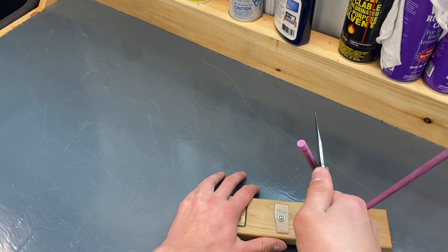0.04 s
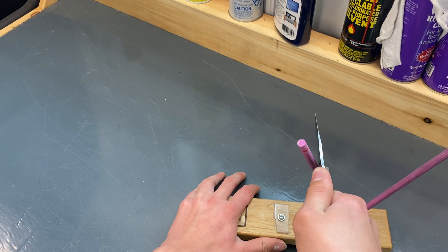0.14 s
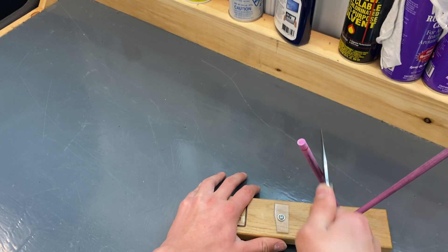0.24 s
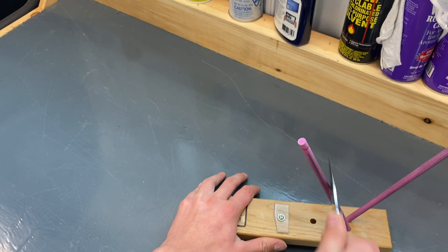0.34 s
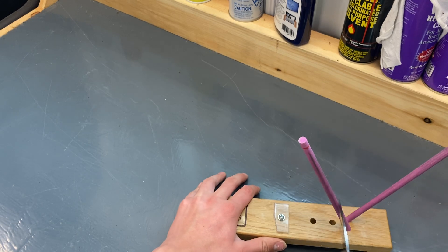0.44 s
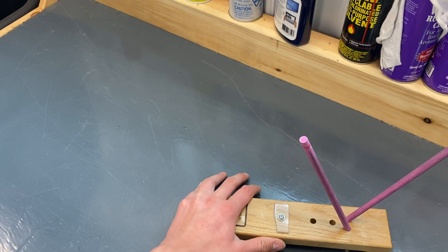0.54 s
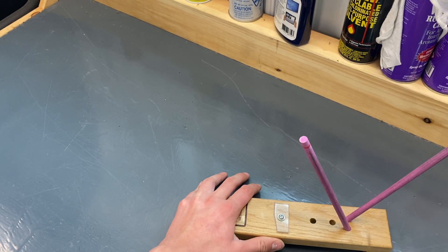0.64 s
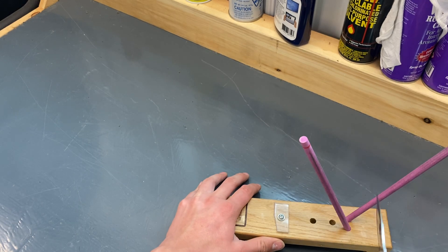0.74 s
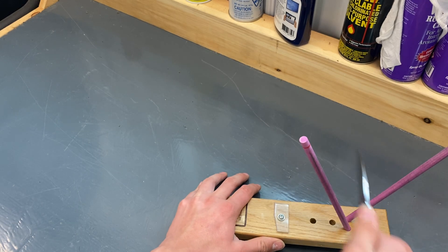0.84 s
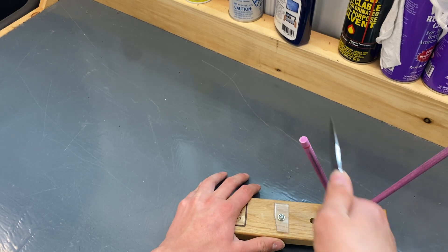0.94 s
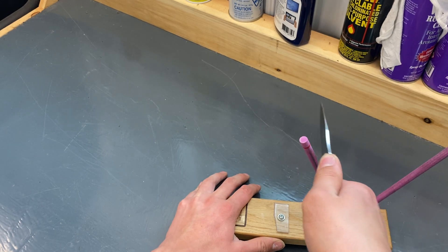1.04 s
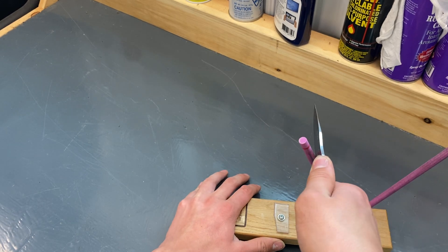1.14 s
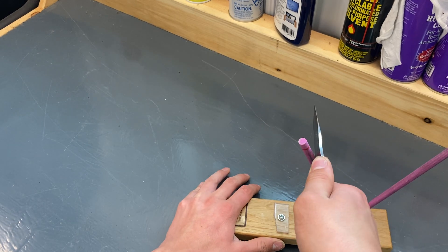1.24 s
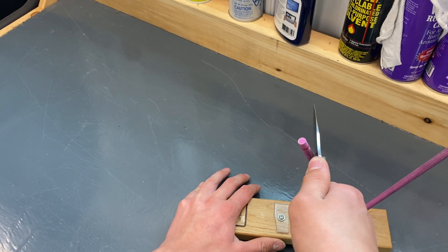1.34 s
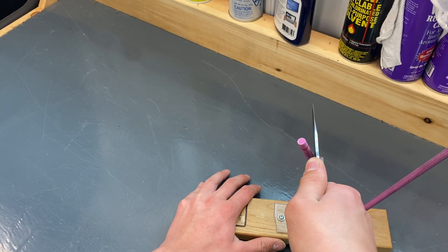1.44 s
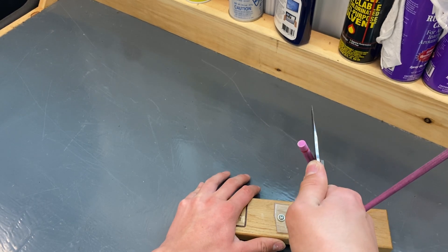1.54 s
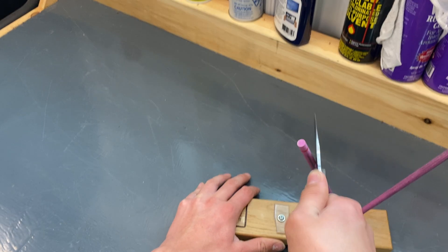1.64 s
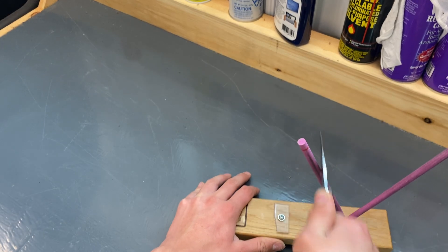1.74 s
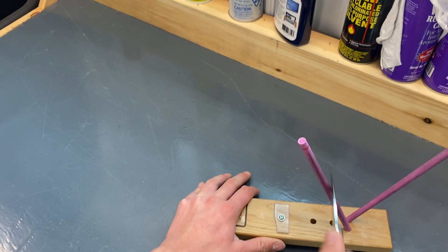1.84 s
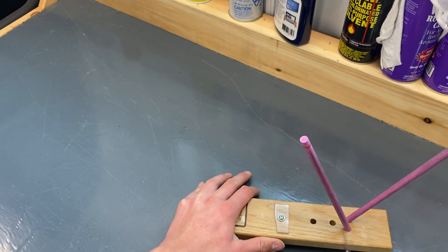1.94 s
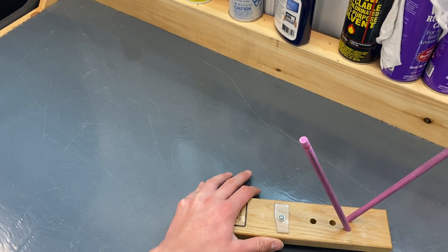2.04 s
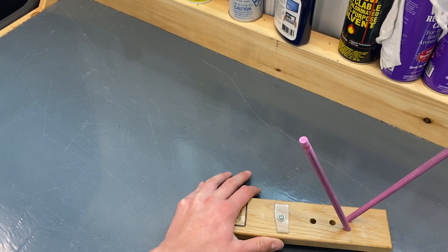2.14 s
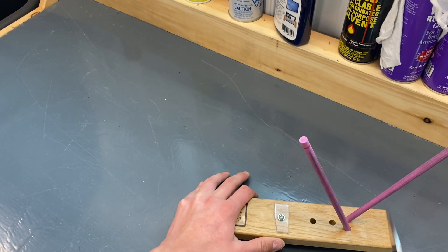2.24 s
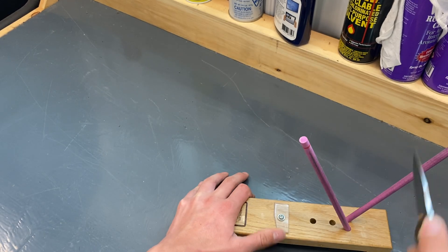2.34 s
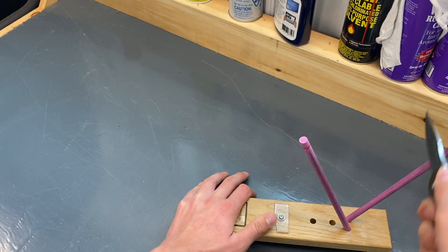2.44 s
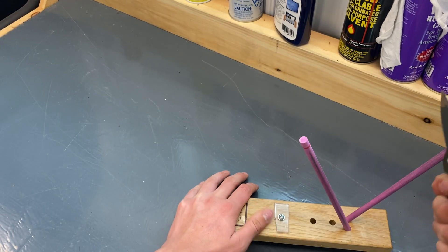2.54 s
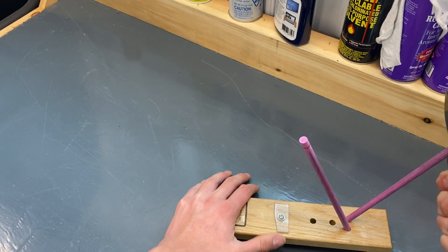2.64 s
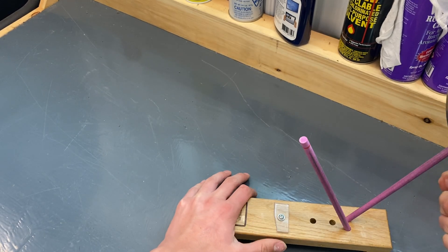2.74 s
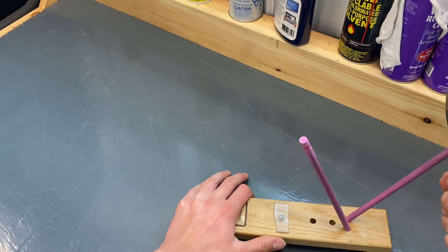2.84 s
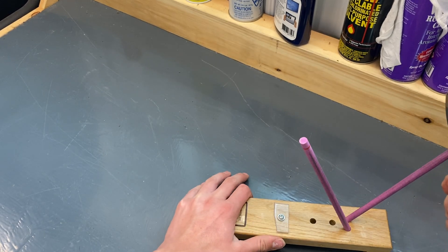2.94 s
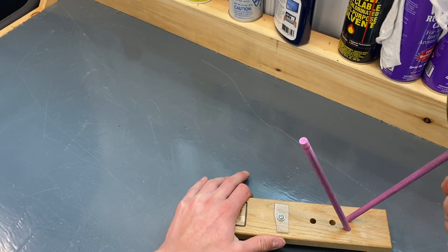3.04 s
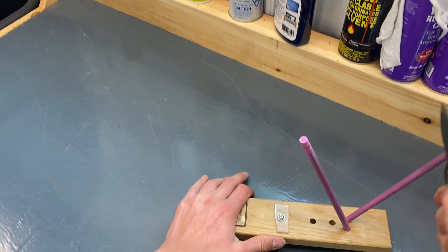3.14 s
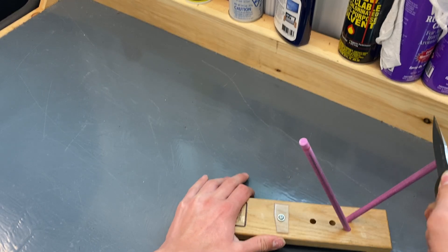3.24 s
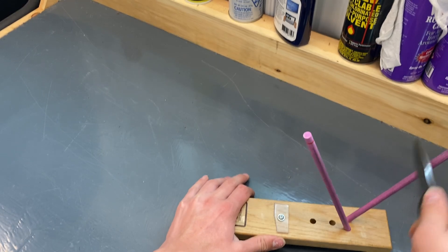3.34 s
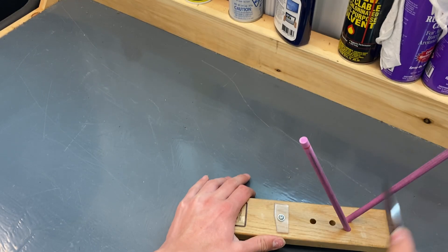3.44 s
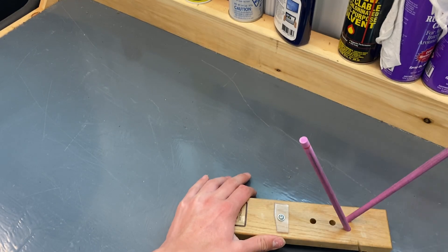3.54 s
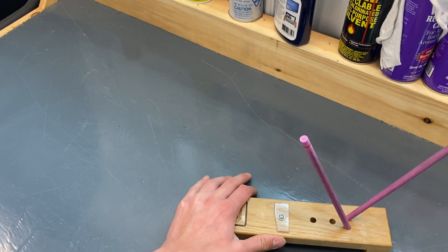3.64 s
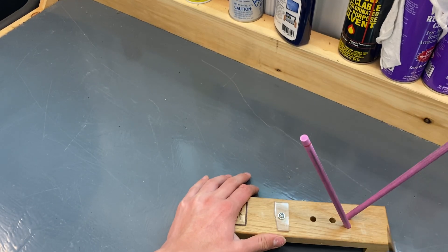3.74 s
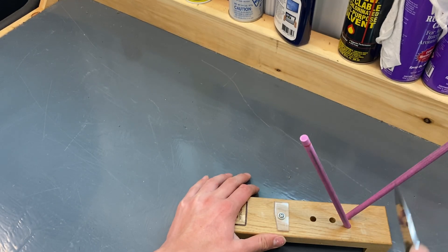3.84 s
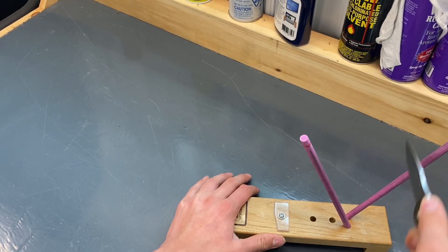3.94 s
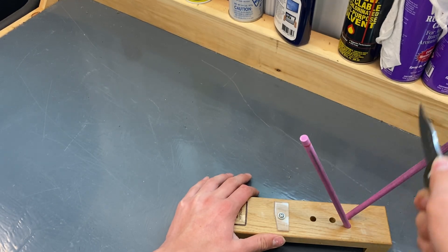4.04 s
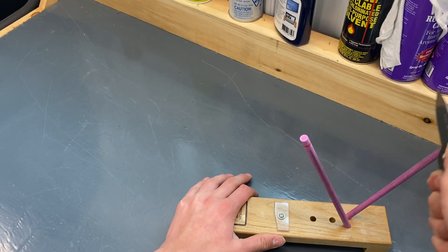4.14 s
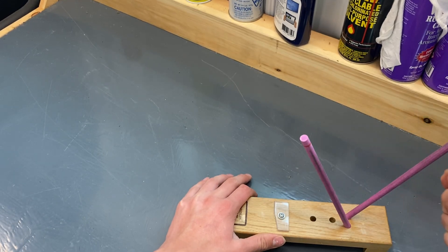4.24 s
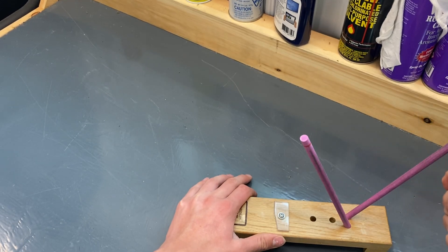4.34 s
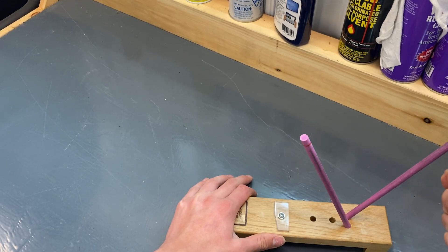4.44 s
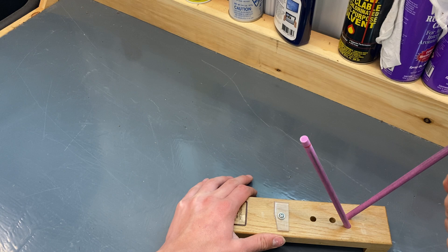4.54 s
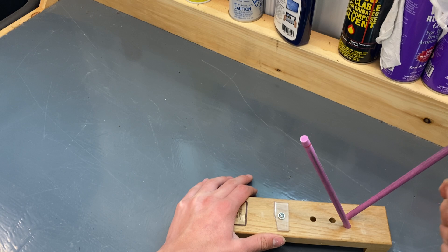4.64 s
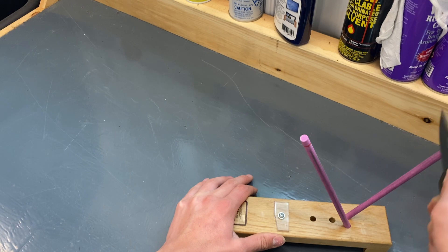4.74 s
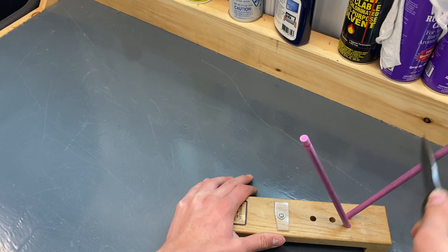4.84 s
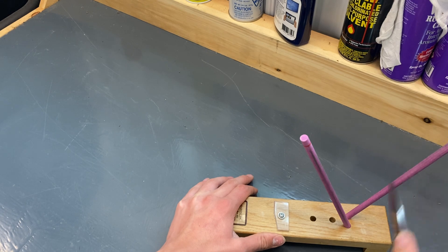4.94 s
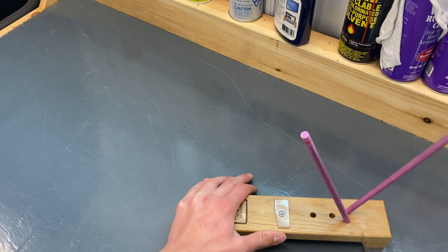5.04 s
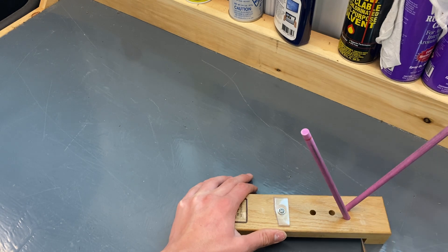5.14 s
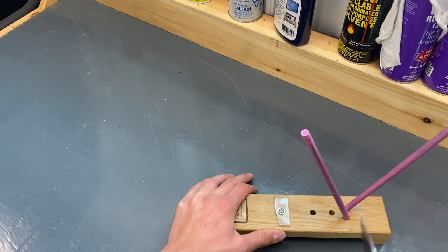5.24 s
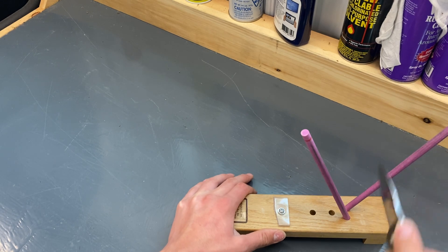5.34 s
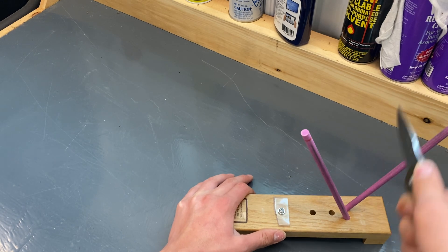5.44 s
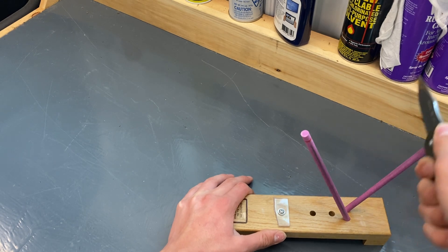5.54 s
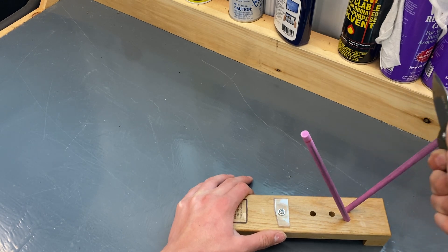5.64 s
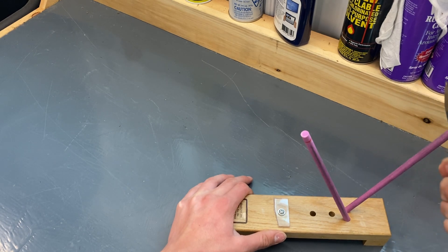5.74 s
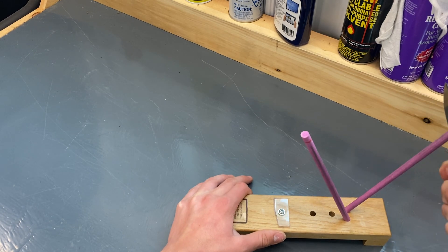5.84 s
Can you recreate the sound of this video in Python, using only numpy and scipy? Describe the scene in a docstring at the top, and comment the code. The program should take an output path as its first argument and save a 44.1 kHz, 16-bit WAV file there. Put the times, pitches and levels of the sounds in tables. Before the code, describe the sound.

A knife edge rasps down ceramic rods in four short separated strokes, each rising from hollow scrape to bright hiss, with wooden knocks between.

```python
"""Over a low workshop hush a knife edge lands, catches and rasps down a ceramic rod: four strokes on two rods.
Friction noise drives rod, blade and edge resonances; a blade resonance climbs from heel to tip as hiss grows.
The wooden base rumbles and bumps on the bench, and a rod clicks in its socket, all as noise bursts and damped
modes. Short bright zips, soft faint hiss swells and a faint tone join in; noise tails form the bare room's echoes."""
import sys
import numpy as np
from scipy import signal
from scipy.fft import rfft, irfft, next_fast_len
from scipy.io import wavfile
from scipy.ndimage import uniform_filter1d, map_coordinates

SR = 44100
rng = np.random.default_rng(int(sys.argv[2]) if len(sys.argv) > 2 else 0)


def generate_wav(sig):
    """Save sig (samples, or channels by samples) to the path in sys.argv[1] as 16-bit PCM at SR."""
    pcm = np.round(np.clip(np.atleast_2d(sig).T, -1, 1) * 32767).astype(np.int16)
    wavfile.write(sys.argv[1], SR, pcm)


N = 260188
TIME = np.arange(N) / SR  # s


def amp(db):
    """Logarithmic level: decibels become an amplitude gain."""
    return 10 ** (np.asarray(db) / 20)


def unit(x):
    """Power normalisation: the signal is scaled to rms 1."""
    return x / np.sqrt(np.mean(x ** 2) + 1e-20)


def along(points, hz):
    """Logarithmic frequency scale: (frequency_hz, value) points are interpolated on it."""
    frequency, value = np.transpose(points)
    return np.interp(np.log(hz + 1), np.log(frequency + 1), value)


def wobble(rate):
    """Slow random modulation: a smooth curve through `rate` random knots a second."""
    knots = rng.standard_normal(int(N * rate / SR) + 4)
    return map_coordinates(knots, [TIME * rate])


def filtered(x, response):
    """Linear filtering: the spectrum of x is multiplied by a response of frequency."""
    size = x.shape[-1]
    padded = next_fast_len(size + SR // 4)
    hz = np.fft.rfftfreq(padded, 1 / SR)
    return irfft(rfft(x, padded) * response(hz), padded)[..., :size]


def coloured(x, spectrum):
    """Spectral shaping: x is weighted by (frequency_hz, level_db) points, then set to rms 1."""
    return unit(filtered(x, lambda hz: amp(along(spectrum, hz))))


def resonate(x, modes):
    """Modal superposition: x drives parallel resonances of alternating sign, then is set to rms 1."""
    def response(hz):
        total = 0
        for k, (centre, width, db) in enumerate(modes):
            damping = 1j * hz * width
            total = total + (-1) ** k * amp(db) * damping / (centre ** 2 - hz ** 2 + damping)
        return total
    return unit(filtered(x, response))


def gliding(x, centre_hz, width_hz):
    """Time-varying resonance: a spectral peak follows a moving centre; the result is set to rms 1."""
    hz, t, z = signal.stft(x, SR, nperseg=512)
    centre = np.interp(t, TIME, centre_hz)
    peak = 1 / (1 + ((hz[:, None] - centre) / width_hz) ** 2)
    return unit(signal.istft(z * peak, SR, nperseg=512)[1][:N])


def grit(spiky_db):
    """Granular noise: dense tiny impulses of very unequal size, as when ceramic grains strike the edge."""
    sizes = amp(spiky_db * rng.standard_normal(N))
    return unit(rng.standard_normal(N) * sizes)


def burst(spectrum, t60, attack):
    """Transient excitation: coloured noise rises over `attack` and decays by 60 dB in `t60` seconds."""
    t = np.arange(SR // 2) / SR
    noise = coloured(rng.standard_normal(len(t)), spectrum)
    return noise * amp(-60 * t / t60) * (1 - np.exp(-t / attack))


def struck(modes, attack):
    """Free vibration: damped sinusoidal modes ring at slightly new strengths for each blow."""
    t = np.arange(SR // 2) / SR
    scatter_db = rng.normal(0, 1.5, len(modes))
    ring = np.zeros(len(t))
    for (hz, db, t60), change_db in zip(modes, scatter_db):
        ring += amp(db + change_db - 60 * t / t60) * np.sin(2 * np.pi * hz * t)
    return ring * (1 - np.exp(-t / attack))


def swells(events):
    """Amplitude envelope: Gaussian swells from (centre_s, half_length_s, level_db) rows."""
    return sum(amp(db) * np.exp(-((TIME - s) / half_s) ** 2) for s, half_s, db in events)


def add(track, s, sound):
    """Linear superposition: a sound is mixed into the track at time s."""
    part = track[max(round(s * SR), 0):][:len(sound)]
    part += sound[:len(part)]


# Spectrum of the workshop hush: frequency_hz [Hz], level_db [dB]
HUSH_SPECTRUM = [(15, -38), (25, 4), (108, -5.5), (354, -22), (545, -29.5), (962, -25), (1190, -33),
                 (2910, -41.5), (6050, -39), (7510, -48), (10700, -48), (16000, -64.5)]
# Stereo width of the hush and the echoes: frequency_hz [Hz], side_level_db [dB]
STEREO_WIDTH = [(60, -19.5), (170, -11), (350, 2), (2500, -1.5), (3600, -1.5), (5000, 3), (7000, 0)]


def widened(mid, side):
    """Sum and difference stereo: the side signal is weighted by frequency, so the bass is nearly mono."""
    side = filtered(side, lambda hz: amp(along(STEREO_WIDTH, hz)))
    return np.array([mid + side, mid - side])


def air():
    """Stationary broadband noise: the low steady hush of the workshop."""
    mid, side = (coloured(rng.standard_normal(N), HUSH_SPECTRUM) for _ in range(2))
    return amp(-67.5) * widened(mid, side)


def echoes(x, decay, delay):
    """Diffuse reverberation: x is convolved with a noise tail, each frequency dying at its own speed."""
    noise = rng.standard_normal((2, 3 * SR // 2))
    hz, t, z = signal.stft(noise, SR, nperseg=256)
    decayed = z * amp(-60 * t / along(decay, hz)[:, None])
    tail = widened(*signal.istft(decayed, SR, nperseg=256)[1])
    delayed = np.pad(x, (round(delay * SR), 0))
    return signal.fftconvolve(delayed[None], tail / np.linalg.norm(tail[0]), axes=1)[:, :N]


# Decay of reflections from bench top and shelf: frequency_hz [Hz], t60_s [s]
NEAR_DECAY = [(100, 0.042), (1000, 0.14), (4000, 0.094), (14000, 0.021)]
# Decay of the bare workshop: frequency_hz [Hz], t60_s [s]
WORKSHOP_DECAY = [(60, 0.56), (250, 1.82), (1000, 1.326), (3000, 1.454), (5000, 1.154), (8000, 0.62),
                  (14000, 0.52)]
# Colour of the far echoes: frequency_hz [Hz], level_db [dB]
WALL_COLOUR = [(60, 5.5), (170, -6), (400, 11.5), (700, 3), (1100, 0), (1500, -3.5), (3000, -1), (5000, 3),
               (6200, -4.5), (7500, -2), (14000, -7.5)]


def room(dry):
    """Early and late reflections: a short near tail precedes the long coloured tail of the workshop."""
    near = amp(-6.5) * echoes(dry, NEAR_DECAY, delay=0.0006)
    far = filtered(dry, lambda hz: amp(along(WALL_COLOUR, hz)))
    return near + amp(-13.5) * echoes(far, WORKSHOP_DECAY, delay=0.012)


# A faint narrow tone: centre_s [s], half_length_s [s], pitch_hz [Hz], level_db [dB before wavering]
FAINT_TONE = (4, 0.11, 678.5, -62)


def faint_tone():
    """Frequency modulation: a thin sine wavers in pitch and level as it swells and fades."""
    s, half_s, hz, db = FAINT_TONE
    phase = 2 * np.pi * np.cumsum(hz + 14 * wobble(30)) / SR
    return amp(1.2 * wobble(20)) * swells([(s, half_s, db)]) * np.sin(phase)


# Soft faint hiss swells: centre_s [s], half_length_s [s], level_db [dB]
FAINT_HISSES = [(2.322, .17, -68.5), (2.618, 0.019, -66)]


def faint_hisses():
    """Amplitude-modulated noise: two soft airy swells of granular noise."""
    spectrum = [(500, -8.5), (2500, -0.5), (6000, -4), (15000, -3)]  # (Hz, dB)
    return swells(FAINT_HISSES) * coloured(grit(spiky_db=4), spectrum)


# Spectrum of the hard tick of a bump: frequency_hz [Hz], level_db [dB]
TICK_SPECTRUM = [(100, -3.5), (500, 6), (1100, 2), (2000, -4.5), (3000, -0.5), (4000, -17), (6200, -29.5),
                 (8000, -24), (16000, -22.5)]
# Spectrum of the bench rumble and thuds: frequency_hz [Hz], level_db [dB]
BENCH_SPECTRUM = [(25, -28.5), (42, -15), (60, 4), (85, -2), (125, 2), (160, -2), (200, -4.5), (260, -5),
                  (350, -14), (600, -23), (1500, -57)]
# Modes of the bench top: pitch_hz [Hz], level_db [dB before scatter], t60_s [s]
BENCH_MODES = [(57, -4, 0.37), (67, -1, 0.12), (111, 1, 0.072), (147, -2, 0.034), (211, -2.5, 0.072),
               (304, -5.5, 0.13), (453.5, -9, 0.069)]


def bump(tick_db, thump_db):
    """Impact excitation: a hard tick, a dull thud and the damped modes of the bench top."""
    tick = amp(tick_db - 5) * burst(TICK_SPECTRUM, t60=0.02, attack=0.00041)
    thud = amp(thump_db - 3) * burst(BENCH_SPECTRUM, t60=0.15, attack=0.001)
    board = amp(thump_db - 4.5) * struck(BENCH_MODES, attack=0.0025)
    return tick + thud + board


# The base bumps the bench: start_s [s], tick_level_db, thump_level_db [dB before the trims in bump]
BASE_BUMPS = [(0.049, -67, -52), (1.613, -26, -39), (1.647, -47.5, -35.5), (1.732, -32, -36),
              (3.03, -56, -65), (3.073, -42.5, -42.5), (3.255, -44.5, -37), (3.577, -19.5, -34),
              (5.853, -38.5, -43.5)]


def base_bumps():
    """Rigid-body rocking: the base tips and knocks the bench at the listed times."""
    out = np.zeros(N)
    for s, tick_db, thump_db in BASE_BUMPS:
        add(out, s, bump(tick_db, thump_db))
    return out


# Spectrum of the rod cracking in its socket: frequency_hz [Hz], level_db [dB]
CRACK_SPECTRUM = [(300, -42), (650, -1), (1000, 9), (1800, 1.5), (2900, 0.5), (3700, -10.5), (4500, -2),
                  (5400, -14), (8500, -20.5), (12000, -5.5), (13500, -20), (16000, -14.5)]
# Modes of the socket wood: pitch_ratio [multiple of knock pitch], level_db [dB before scatter], t60_s [s]
SOCKET_MODES = [(.72, -10.5, 0.0028), (1, 8, 0.021), (1.4, -7.5, 0.042), (1.79, -14, 0.15)]
# Rod clicks: start_s [s], crack_level_db, knock_level_db [dB before trims], knock_pitch_hz [Hz],
# thump_level_db [dB before trim]
ROD_CLICKS = [(1.122, -24.5, -26.5, 980, -56.5), (2.7218, -33, -39, 970, -55.5),
              (4.272, -28, -37, 752, -54.5), (5.7805, -22.5, -40, 900, -45)]


def rod_clicks():
    """Successive impacts: the rod cracks on its socket, knocks the wood and then shakes the bench."""
    out = np.zeros(N)
    for s, crack_db, knock_db, knock_hz, thump_db in ROD_CLICKS:
        socket = np.multiply(SOCKET_MODES, [knock_hz, 1, 1])
        add(out, s, amp(crack_db - 3.5) * burst(CRACK_SPECTRUM, t60=0.03, attack=0.001))
        add(out, s + 0.0018, amp(knock_db - 5) * struck(socket, attack=0.0002))
        add(out, s + 0.008, amp(thump_db + 1) * struck(BENCH_MODES, attack=0.005))
    return out


# Spectrum of the friction hiss: frequency_hz [Hz], level_db [dB]
HISS_SPECTRUM = [(1500, -46), (3500, -5.5), (5200, 2), (7000, -4), (11000, -9), (14500, -7), (16000, -8)]
# The tip slips off the rod: centre_s [s], level_db [dB]
TIP_FLICKS = [(0.503, -32), (1.96, -28.5)]


def tip_flicks():
    """Frictional release: the tip leaves the rod with a short bright zip of granular noise."""
    envelope = swells([(s, 0.0055, db) for s, db in TIP_FLICKS])
    return envelope * coloured(grit(spiky_db=3), HISS_SPECTRUM)


# Positions along the edge: heel, start of the belly, mid belly, tip, very point [place number]
EDGE_PLACES = [0, 1, 1.5, 2, 3]
# One row per place, shared by all strokes: ring_db, rasp_db, hiss_db, squeal_db, rumble_db [dB change;
# hiss before its growth factor], blade_hz, squeal_hz [Hz before unsteadiness]
EDGE_PROFILE = [ (-16.5, -14.5, -13, -12.5, -1, 1050, 6170), (0.5, 0, 0, 0.5, 1, 1100, 6170),
                (-0.5, 6.5, 5.5, 2.5, -5, 1850, 6100), (-1, 8.5, 12.5, 11, -9.5, 2800, 6200),
                (-3.5, 4, 13.5, -0.5, -13, 2900, 6500), ]


def travel(lands, belly, tip, leaves, lateness):
    """Moving contact: each profile column over time as the contact runs from heel to point."""
    place = np.interp(TIME, [lands, belly, tip, leaves], np.arange(4))
    place = np.where(place < 1, place ** lateness, place)
    return [np.interp(place, EDGE_PLACES, column) for column in np.transpose(EDGE_PROFILE)]


# The edge skips off the rod and catches again: catch_s [s], time_off_s [s]
EDGE_SKIPS = [(0.221, 0.023), (1.668, 0.019), (3.127, .022), (3.328, 0.083), (4.646, 0.027), (4.701, 0.024)]


def touching(lands, leaves, release_s):
    """Intermittent contact: gain is near 1 on the rod and decays exponentially once the edge is off."""
    on = (TIME >= lands) & (TIME <= leaves)
    for s, off_s in EDGE_SKIPS:
        on = on & ~((TIME > s - off_s) & (TIME < s))
    last_touch = np.maximum.accumulate(np.where(on, TIME, -1))
    return uniform_filter1d(np.exp((last_touch - TIME) / release_s), size=220)  # softens the corners


# Resonances of each rod in its base: centre_hz [Hz before the stroke's pitch factor], width_hz [Hz],
# level_db [dB]
LEFT_ROD_MODES = [(683, 220, -12.5), (843, 140, -7.5), (1047, 130, 0.5), (1235, 290, -5)]
RIGHT_ROD_MODES = [(584, 113, -7.5), (738, 53, -1.5), (933, 97, -3), (1076, 150, -2), (1294, 100, -5)]
# Resonances of the blade pressed on each rod: centre_hz [Hz], width_hz [Hz], level_db [dB]
LEFT_BLADE_MODES = [(1491, 68, 3), (1774, 150, 2), (2120, 290, 1.5), (2293, 120, 1.5), (2880, 150, -1),
                    (3350, 150, -6.5), (3780, 380, -10.5)]
RIGHT_BLADE_MODES = [(1518, 170, 2), (2090, 120, 1.5), (2333, 230, -2), (2856, 150, 0), (2814, 130, 2),
                     (3086, 110, -3.5), (3290, 62, -4.5), (3950, 530, -12.5)]
RODS = {"left": (LEFT_ROD_MODES, LEFT_BLADE_MODES), "right": (RIGHT_ROD_MODES, RIGHT_BLADE_MODES)}
# Resonances of the thin edge: centre_hz [Hz], width_hz [Hz], level_db [dB]
THIN_EDGE_MODES = [(4470, 300, -11), (4996, 380, -3.5), (5320, 320, -5.5), (5880, 150, -1.5),
                   (7960, 170, -7), (9200, 110, -10.5), (10010, 270, -3.5), (12140, 1000, -6.5),
                   (13800, 790, -6), (15600, 280, -12.5)]
# One row per stroke: rod, start_s, belly_s, tip_s, leave_s [s], pressure_lateness [exponent, 1 = even],
# rod_pitch [factor], ring_db, rasp_db, hiss_db [dB before the edge profile], hiss_growth [factor],
# squeal_db, rumble_db [dB before the edge profile]
KNIFE_STROKES = [ ("left", 0.181, 0.355, 0.464, 0.5, .6, 1, -32, -38.5, -53, .7, -54.5, -40),
                 ("left", 1.593, 1.793, 1.900, 1.955, 4.5, 1.065, -30, -37.5, -53.5, 0.86, -51, -38.5),
                 ("right", 3.097, 3.373, 3.500, 3.531, 0.93, 0.98, -34, -33.5, -48, 1.22, -54, -40.5),
                 ("right", 4.607, 4.848, 4.965, 5.0167, 0.97, 1, -37.5, -40, -55, 1.226, -65.5, -41.5), ]
RELEASE_S, BENCH_RELEASE_S = 0.0048, 0.018  # off the rod, friction dies at once and the bench soon after
CATCH_TICK_DB, CATCH_THUMP_DB = 15, -4.5  # a landing, relative to the rasp there and the stroke's rumble
HARDER_DB_PER_S = 77  # the longer the edge was off, the harder it thumps
WANDER = 0.051  # relative unsteadiness of the climbing resonances
LOWER_RATIO, LOWER_DB = 0.64, -9  # a weaker blade resonance climbs below the main one


def stroke(rod_name, lands, belly, tip, leaves, lateness, pitch,
           ring_db, rasp_db, hiss_db, growth, squeal_db, rumble_db):
    """Friction-driven vibration: grit excites rod, blade and edge; the bench rumbles and landings knock."""
    rod_modes, blade_modes = RODS[rod_name]
    ring, rasp, hiss, whine, rumble, blade_hz, squeal_hz = travel(lands, belly, tip, leaves, lateness)
    tipward = np.clip((blade_hz - 1050) / 700, 0, 1)  # the climbing resonances take over past the heel
    chatter = amp(1.2 * wobble(150) + 1.2 * wobble(45))  # the edge grips and slips

    pitched_modes = np.multiply(rod_modes, [pitch, 1, 1])
    rod = amp(ring_db + ring - 2 * tipward) * resonate(grit(spiky_db=5), pitched_modes)

    body = amp(-4 * tipward) * resonate(grit(spiky_db=7), blade_modes)
    upper_hz = blade_hz * (1 + WANDER * wobble(70))
    lower_hz = LOWER_RATIO * blade_hz * (1 + WANDER * wobble(70))
    upper = amp(-2.5) * gliding(grit(spiky_db=4), upper_hz, width_hz=220)
    lower = amp(LOWER_DB) * gliding(grit(spiky_db=4.5), lower_hz, width_hz=150)
    blade = amp(rasp_db + rasp) * (body + tipward * (upper + lower))

    edge_ring = resonate(grit(spiky_db=2.5), THIN_EDGE_MODES)
    edge_noise = 0.79 * coloured(grit(spiky_db=6.5), HISS_SPECTRUM)
    edge = amp(hiss_db + growth * hiss) * (edge_ring + edge_noise)
    squeal_tone = gliding(grit(spiky_db=3), squeal_hz + 50 * wobble(22), width_hz=40)
    squeal = amp(squeal_db + whine + 3 * wobble(25)) * squeal_tone

    bench = amp(rumble_db + rumble) * coloured(rng.standard_normal(N), BENCH_SPECTRUM)
    out = touching(lands, leaves, RELEASE_S) * chatter * (rod + blade + edge + squeal)
    out += touching(lands, leaves, BENCH_RELEASE_S) * bench

    catches = [skip for skip in EDGE_SKIPS if lands < skip[0] < leaves]
    for s, off_s in [(lands, 0)] + catches:
        tick_db = rasp_db + np.interp(s, TIME, rasp) + CATCH_TICK_DB
        thump_db = rumble_db + CATCH_THUMP_DB + HARDER_DB_PER_S * off_s
        add(out, s, bump(tick_db, thump_db))
    return out


# Level difference of the direct sound: frequency_hz [Hz], left_minus_right_db [dB]
LEFT_LEAN = [(150, 0.5), (1000, 1.5), (2000, 1.5), (3000, 5), (5000, 7.5), (6000, -0.5)]


def scene():
    """Direct and reverberant fields: the sharpener is close, slightly left, amid reflections and hush."""
    dry = sum(stroke(*row) for row in KNIFE_STROKES)
    dry = dry + tip_flicks() + rod_clicks() + base_bumps() + faint_hisses() + faint_tone()
    direct = filtered(dry, lambda hz: amp(np.outer([0.5, -0.5], along(LEFT_LEAN, hz))))
    return direct + room(dry) + air()


# Phase between the treble channels: frequency_hz [Hz], left_lead_rad [rad]
TREBLE_PHASE = [(6000, 13.3), (7300, 12.57), (9000, 9.42), (11200, 6.28), (13250, 3.14), (15200, 0),
                (16000, -.6)]
TOP_HZ = 15900  # upper band limit


def record(dry):
    """Interchannel phase: both sides share the left treble, phase-shifted; bass and top are band-limited."""
    def treble(hz):
        return 1 - 1 / (1 + (hz / 6000) ** 40)

    def shifted_treble(hz):
        lead = np.interp(hz, *np.transpose(TREBLE_PHASE))
        return treble(hz) * np.exp(0.5j * np.outer([1, -1], lead))

    def band(hz):
        return (1 - 1 / (1 + (hz / 42) ** 6)) / (1 + (hz / TOP_HZ) ** 200)

    low = filtered(dry, lambda hz: 1 - treble(hz))
    high = filtered(dry[0], shifted_treble)
    return filtered(low + high, band)


dry = scene()
out = record(dry)
generate_wav(out)
```